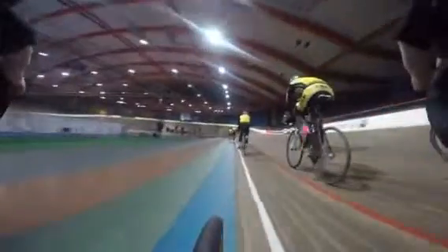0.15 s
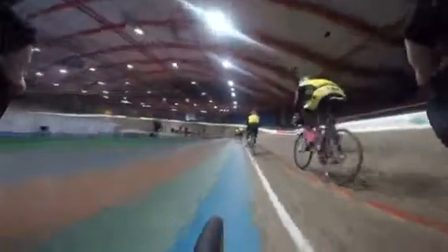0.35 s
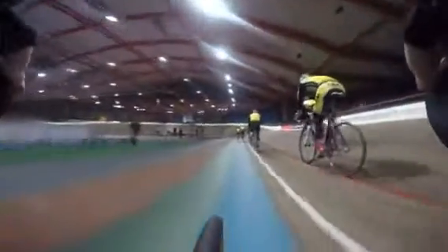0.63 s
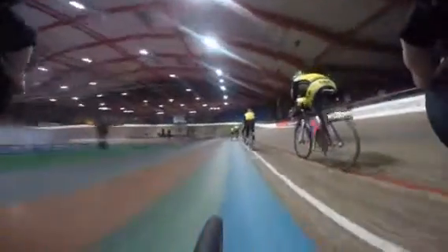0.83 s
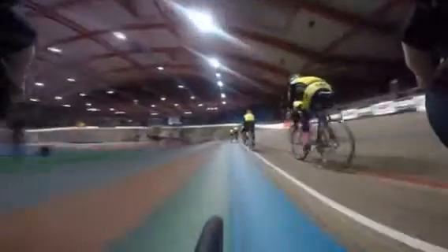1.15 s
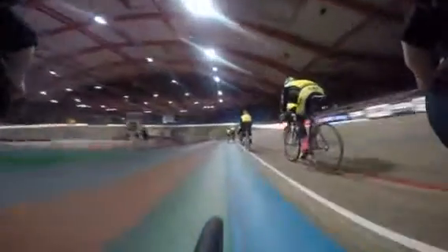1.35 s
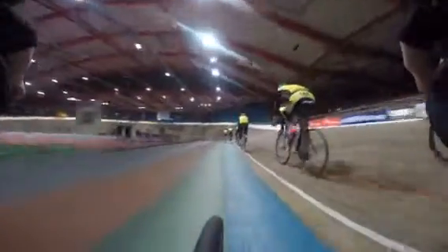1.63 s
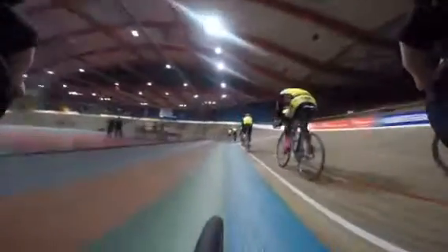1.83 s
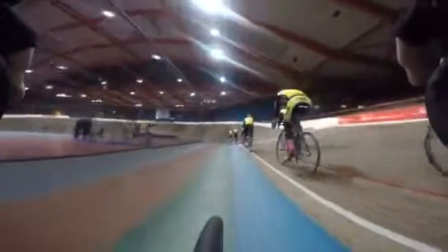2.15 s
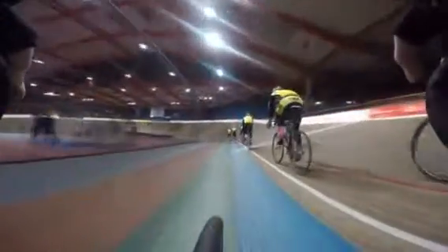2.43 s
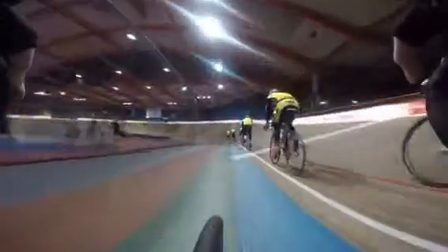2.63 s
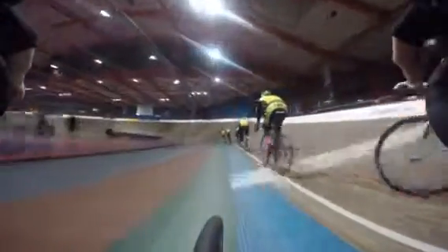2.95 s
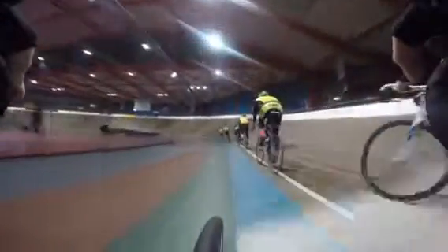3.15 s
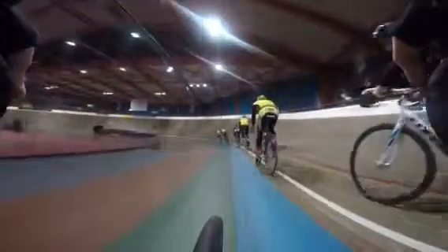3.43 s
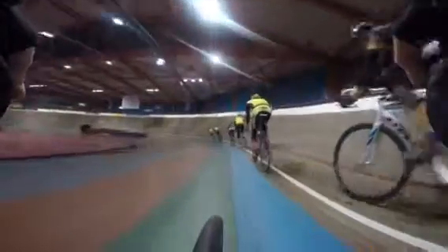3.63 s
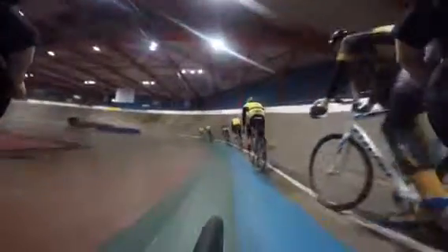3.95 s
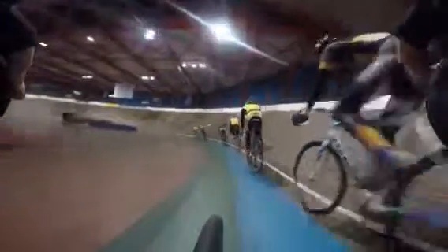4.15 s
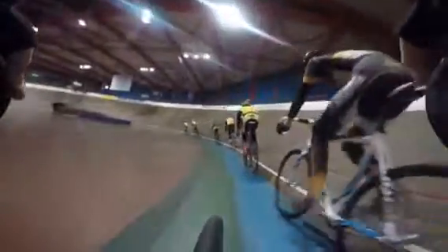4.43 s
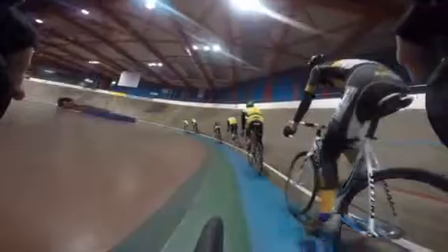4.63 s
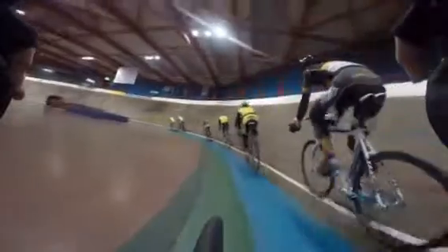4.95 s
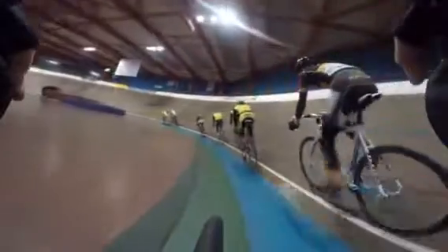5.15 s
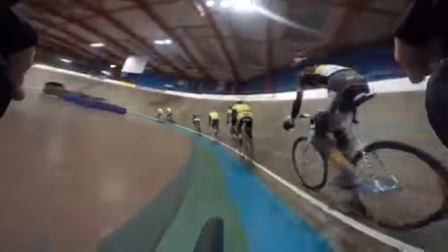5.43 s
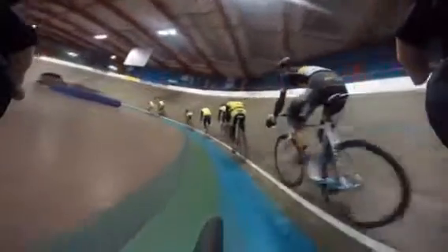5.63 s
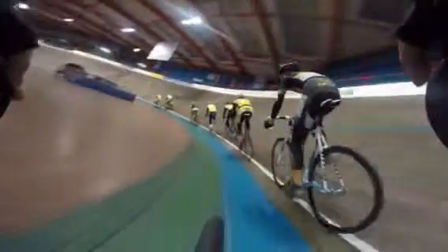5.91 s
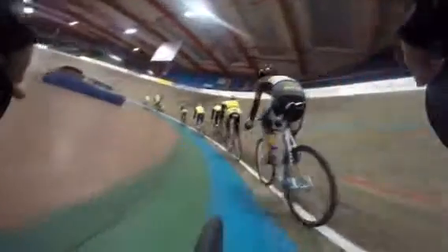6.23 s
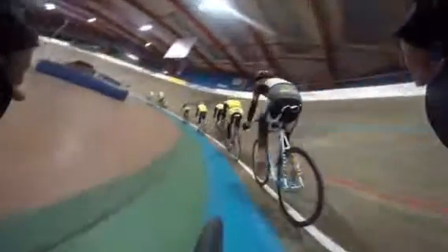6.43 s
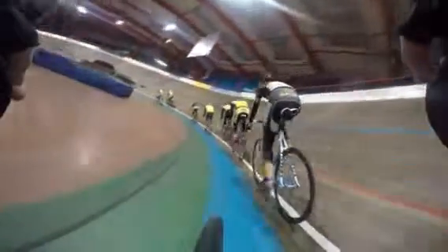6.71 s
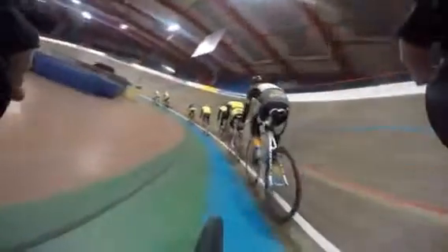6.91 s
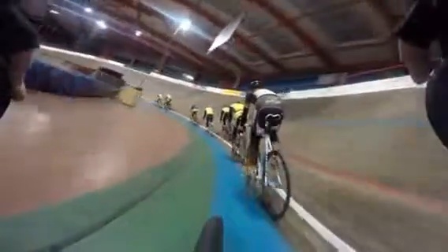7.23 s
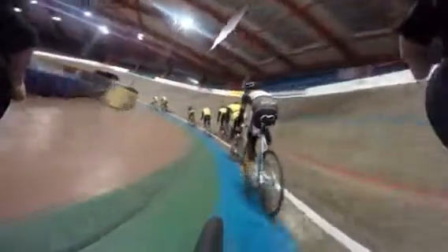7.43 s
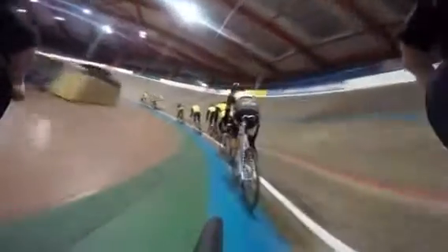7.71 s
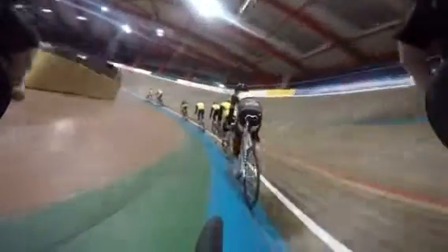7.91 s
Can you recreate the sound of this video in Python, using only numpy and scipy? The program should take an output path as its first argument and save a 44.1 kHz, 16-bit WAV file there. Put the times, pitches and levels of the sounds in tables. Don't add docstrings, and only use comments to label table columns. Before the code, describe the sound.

Close, rough on-bike sound on an indoor banked wooden track. Continuous deep wind rumble and a hollow mid-low tyre hum lie beneath a dense, bright chain rattle that surges two to three times a second. Stiff links snap metallically while board joints thump and loose boards knock. A faint airy hiss swells slightly as another rider passes, and the final strokes soften.

```python
import sys
import numpy as np
from scipy import signal
from scipy.fft import next_fast_len
from scipy.io import wavfile
from scipy.ndimage import uniform_filter1d

SR = 44100
rng = np.random.default_rng(int(sys.argv[2]) if len(sys.argv) > 2 else 0)


def bounce(signal):
    frames = np.transpose(np.atleast_2d(signal))
    limited = np.clip(frames, -1, 1)
    pcm = np.round(limited * 32767).astype(np.int16)
    wavfile.write(sys.argv[1], SR, pcm)


def how_loud(loudness_db):
    steps = np.asarray(loudness_db, float) / 20
    return 10 ** steps


N = 355887
T = np.arange(N) / SR

# (time [s], wind level [dB], tyre roar level [dB])
RIDE_LEVELS = [(0, -14.5, -17), (.42, -17.5, -18.5), (.75, -20, -18), (1.2, -16, -19.5), (1.9, -18, -21),
               (2.3, -17, -23.5), (2.75, -16, -20), (3.3, -15, -19.5), (3.6, -19.5, -23), (4.2, -16.5, -19),
               (4.7, -17.5, -22), (5.12, -14, -20.5), (5.9, -19, -19), (6.35, -18.5, -18.5),
               (6.75, -17, -20.5), (7.3, -17.5, -20), (7.7, -18, -19.5), (8.07, -14.5, -18.5)]


def chain():
    # (time [s], links passed [count])
    link_passes = [(0.0, 0.31), (0.67, 48.37), (1.34, 96.18), (2.02, 143.74), (2.69, 189.82),
                   (3.36, 235.13), (4.04, 280.36), (4.71, 324.1), (5.38, 367.2), (6.05, 410.13),
                   (6.72, 452.98), (7.4, 496.08), (8.07, 538.14)]
    # (time [s], peak [dB], brightness [dB])
    clank_events = [(0.5775, -16, -5), (0.608, -4.5, -0.5), (1.2214, -9.5, -7), (1.3356, -8.5, 0.5),
                    (1.635, -8, -6), (1.8468, -8, -3), (1.965, -3, -5), (2.6312, -10, -2),
                    (2.6907, -6.5, -5), (2.8948, -14, 2), (3.251, -15, 6), (3.3406, -8.5, -2),
                    (3.3727, -6.5, -1), (3.727, -11, -4), (3.791, -8, 1.5), (4.0014, -3, -6),
                    (4.0626, -12.5, -10), (4.1242, -14.5, 9), (4.188, -11, -6), (4.4106, -12.5, 2),
                    (4.4258, -8, 2), (4.5394, -9, -6), (4.8024, -11, 2), (4.8318, -6, -21),
                    (5.0648, -10, -4.5), (5.2016, -12, 0), (5.579, -10, -6), (5.6123, -5.5, -3),
                    (5.671, -11, -11.5), (5.9348, -9.5, -2)]
    # (frequency [Hz], width [Hz], level [dB])
    metal_modes = [(1207, 17, -4), (1295, 64.6, 3), (1390.6, 16.6, 1.5), (1705, 38, -5), (1953, 81, -12),
                   (2127, 240, -13), (2408, 73, -1), (2766, 26, -4), (3115, 110, -3), (3202, 16.6, 2.5),
                   (3256, 113, -1), (3270, 86, 0), (3670, 9.5, -6.5), (4027, 183, -9), (4406, 38, -7),
                   (4570, 196, -9), (5070, 86, -10), (6064, 170, -21), (7040, 74, -27), (7670, 130, -22.5),
                   (8100, 150, -22.5), (8170, 91, -57), (8570, 200, -30), (9370, 84, -31.5),
                   (10060, 330, -39), (10040, 52, -37), (12100, 5000, -50)]
    stiff_links = [12, 14, 18, 22, 37, 42, 44, 68, 71, 88, 90, 94]
    chain_links, modes = 96, len(metal_modes)
    slap_db, slap_s = .8, .06
    snap_db, snap_bright_db, snap_growth = 5, 2, 1.5
    snap_share = .03
    clack_hz, clack_width_hz = 3270, 140

    load_db, bright_db = pedalling()
    flap = uniform_filter1d(rng.standard_normal(N), round(slap_s * SR), mode="wrap")
    load_db = load_db + slap_db * evened(flap)

    count = np.arange(1, int(link_passes[-1][1]) + 1)
    link = count % chain_links
    seat_s = np.interp(count, *np.transpose(link_passes)[::-1])
    chance = rng.standard_normal((len(count), modes + 3))
    stiff_db = 2.0 * rng.standard_normal(chain_links)[link] + 2.0 * chance[:, 0]
    stiff_db += 2.0 * (-1) ** count
    lift_s = seat_s + 0.0063 + 0.0048 * chance[:, 2]
    contact_s = np.r_[seat_s - .002 + .0009 * chance[:, 1], lift_s]

    luck = rng.random((len(count), 3))
    near = abs(seat_s[:, None] - np.transpose(clank_events)[0]).min(1) < .012
    light_db = snap_growth * (np.interp(seat_s, T, load_db) + 25) - 25.5
    light_db = light_db + snap_db + 6 * (luck[:, 1] - .5)
    light_bright_db = snap_bright_db + 10 * (luck[:, 2] - .5)
    light = np.c_[seat_s - .003, light_db, light_bright_db]
    snapping = (luck[:, 0] < snap_share) | np.isin(link, stiff_links)
    s, peak_db, clank_bright_db = np.r_[clank_events, light[snapping & ~near]].T

    colour = rng.standard_normal((len(s), modes))
    late = rng.random((len(s), modes))
    pause = hush(s - .005, peak_db, quiet_db=-10, length_s=0.002)
    shared, out = rng.standard_normal(N), np.zeros(N)
    for k, (hz, width_hz, db) in enumerate(metal_modes):
        tilt = np.log2(hz / 3200)
        size = how_loud(stiff_db + 2.7 * chance[:, k + 3])
        size = np.r_[size, .55 * size[::-1]]
        lag_s = .003 * rng.random(len(contact_s))
        rattle = (0.75 * shared + 0.82 * rng.standard_normal(N)) / np.sqrt(np.pi * 100 / SR)
        links = (0.15 + 1.605 * bursts(contact_s, size, 0.00029, 0.003)) * rattle
        links += how_loud(25.5) * blows(contact_s + lag_s, size)
        reach_db = clank_bright_db * np.clip(tilt, 0, 1.9) + 4.8 * min(tilt, 0) - 2.1 * max(tilt, 0)
        reach_db -= 9 * np.exp(-(tilt / .12) ** 2)
        snaps = blows(s + .002 * late[:, k], how_loud(peak_db + 31 + reach_db + 4 * colour[:, k]))
        force = how_loud(load_db - 8.5 + bright_db * min(tilt, 1.4)) * links * pause + snaps
        out += how_loud(db) * ring(ring(force, hz, 4 * width_hz), hz, width_hz)
    clacks = blows(s - .0004, how_loud(peak_db + 37 + 1.5 * colour[:, 0]))
    return out + ring(ring(clacks, clack_hz, 2 * clack_width_hz), clack_hz, clack_width_hz)


def pedalling():
    # (dead centre before [s], slack level [dB], full load [s], chain load [dB],
    # brightness [dB])
    strokes = [(.08, -30, 0.16, -25, -0.5), (.44, -29.5, 0.59, -23, -0.5), (.68, -31, .99, -25.5, 0),
               (1.1, -29, 1.31, -20, -1.5), (1.46, -26.5, 1.62, -21, 1), (1.73, -33, 1.89, -23.5, 1),
               (2.09, -33, 2.37, -24.5, 0.5), (2.45, -31, 2.68, -21, 0), (2.8, -33, 2.95, -21.5, -0.5),
               (3.12, -28, 3.36, -22, 1), (3.56, -34, 3.7, -21, 1), (3.94, -28, 4.14, -19.5, -0.5),
               (4.29, -26, 4.43, -20.5, 0.5), (4.64, -28, 4.9, -22, 2.5), (5.03, -27.5, 5.18, -20.5, 1.5),
               (5.29, -28, 5.61, -21, 0.5), (5.75, -31.5, 5.92, -19.5, 0.5), (6.05, -29.5, 6.22, -26, 1.5),
               (6.45, -32.5, 8.7, -25, 1), (6.8, -28, 6.92, -26, 1), (7.12, -31, 7.4, -27, 1.5),
               (7.6, -26.5, 8, -27.5, -1)]
    slack_bright_db, push_shape = 1.5, 0.49
    dead_s, slack_db, top_s, top_db, bright_db = np.transpose(strokes)
    marks_s = np.r_[np.c_[dead_s, top_s].ravel(), top_s[-1] + .25]
    phase = np.pi / 2 * np.interp(T, marks_s, np.arange(len(marks_s)))
    push = abs(np.sin(phase)) ** (2 * push_shape)
    slack_db = np.interp(T, dead_s, slack_db)
    top_db = np.interp(T, top_s, top_db)
    bright_db = np.interp(T, top_s, bright_db)
    load_db = slack_db + push * (top_db - slack_db)
    return load_db, slack_bright_db + push * (bright_db - slack_bright_db)


def tyres():
    # (time [s], peak [dB], brightness [dB])
    joint_hits = [(0.166, -4, 0.5), (0.634, -7, -7), (0.846, -6, -2), (1.432, -4.5, -3), (1.701, -4, -11),
                  (1.852, -4.5, -3), (1.971, -2, 0.5), (2.051, -2, 0.5), (2.122, -3, -30),
                  (2.48, -2.5, -22), (2.736, -4, -6), (3.073, -11, 2), (3.288, -4, -11), (3.346, -13, 8),
                  (3.493, -4, 0.5), (3.835, -1.5, -6), (4.066, -3.5, -2), (4.191, -5, -2), (4.222, -5, -13),
                  (4.597, -1.5, -2.5), (5.285, -14, -9), (5.584, -3, -9), (5.616, -9, -4),
                  (5.849, -10.5, 7.5), (5.889, -1.5, -28), (6.121, -3, -20), (6.359, -4, -36),
                  (6.698, -3, -8), (7.365, -11.5, 4), (7.662, -21, -3)]
    # (frequency [Hz], width [Hz], level [dB])
    frame_modes = [(421, 44.3, 1), (468, 75.4, -2.5), (570, 26, -7), (637, 38.5, -11.5), (752, 51, -21),
                   (904.5, 45, -19.5), (1073, 116, -20)]
    s, peak_db, bright_db = np.transpose(joint_hits)
    lumps = how_loud(2.9 * evened(uniform_filter1d(rng.standard_normal(N), size=900)))
    pause = hush(s - .012, peak_db, quiet_db=-8.0, length_s=0.0082)
    roar = how_loud(curves(RIDE_LEVELS)[1] - 1.0) * lumps * pause
    out = np.zeros(N)
    for hz, width_hz, db in frame_modes:
        tilt = np.log2(hz / frame_modes[0][0])
        kicks = blows(s + .0005, how_loud(peak_db + 40.5 + (bright_db + 3) * tilt))
        grain = rng.standard_normal(N) / np.sqrt(np.pi * 70 / SR)
        out += how_loud(db) * ring(ring(roar * grain + kicks, hz, 3 * width_hz), hz, width_hz)
    return out


def knocks():
    # (time [s], peak [dB], pitch [Hz])
    board_knocks = [(0.162, -31, 563), (0.276, -12, 618), (0.607, -23, 634), (0.75, -16, 645),
                    (1.425, -5, 557), (1.554, -32, 1030), (1.698, -16, 546), (1.849, -21, 550),
                    (1.97, -19, 560), (2.05, -21, 567), (2.381, -21, 640), (2.726, -9.5, 530),
                    (2.783, -14.5, 644), (2.946, -18.5, 1040), (3.071, -17.5, 684), (3.34, -11.5, 585),
                    (3.371, -10, 570), (3.484, -10.5, 557), (3.604, -21, 1030), (3.823, -15.5, 730),
                    (4.479, -21, 657), (4.608, -2.5, 560), (4.797, -37, 561), (4.939, -12, 572.6),
                    (4.966, -12.5, 791), (5.304, -13, 662), (5.421, -18, 616), (5.61, -11.5, 540),
                    (6.359, -17, 637), (7.177, -25, 640)]
    t, out = np.arange(3000) / SR, np.zeros(N + 3000)
    swell = (1 - np.exp(-t / .0012)) * np.exp(-t / .009)
    for s, peak_db, hz in board_knocks:
        angle = 2 * np.pi * hz * t
        trio = np.sin(angle) + .45 * np.sin(1.22 * angle) + .45 * np.sin(.83 * angle)
        at = max(round((s + 0.00088) * SR), 0)
        out[at:at + 3000] += how_loud(peak_db + 1.5) * trio * swell
    return out[:N]


def wind():
    # (frequency [Hz], level [dB per Hz])
    wind_spectrum = [(8.8, -37), (15, 4.5), (32, -0.5), (72, 2.5), (87, -7.5), (113, -9.5), (292, -21),
                     (335, -23.5), (400, -13.5), (520, -25), (880, -120)]
    # (time of the top [s], level [dB], length [s])
    sway_events = [(.18, -18, 0.045), (.56, -10, 0.049), (.78, -6, 0.1), (1.27, -15, 0.041),
                   (1.583, -13, 0.071), (1.88, -5.5, 0.072), (2.8, -14, 0.046), (4.35, -18, 0.068),
                   (4.66, -19, 0.072), (5.91, -6.5, .08), (6.095, -9.5, 0.054), (6.386, -5, 0.12),
                   (7.108, -22, 0.21), (7.37, -9, 0.056), (7.63, -12.5, 0.039)]
    sway_hz, sway_width_hz, rest_db = 77, 5, -18.5
    evenness = .8
    wander = ring(rng.standard_normal(N), sway_hz, sway_width_hz)
    wander = ring(wander, sway_hz, sway_width_hz)
    wander = signal.hilbert(wander, next_fast_len(N))[:N]
    sway = evened((wander / abs(wander) ** evenness).real)
    swing = how_loud(rest_db) + sum(how_loud(db) * bump(s, length_s) for s, db, length_s in sway_events)
    buffeting = how_loud(curves(RIDE_LEVELS)[0] + 2.5) * noise(wind_spectrum, 0.75, wide=3, long=4)
    return buffeting + how_loud(-8.5) * swing * sway


def hall():
    # (frequency [Hz], level [dB per Hz])
    hiss_spectrum = [(900, -29), (1500, -12), (2400, -8.5), (3260, -7), (3700, -35), (4620, -14.5),
                     (5500, -18.5), (7140, -27), (9200, -35.5), (10700, -36), (12000, -34), (13500, -38.5),
                     (15200, -38)]
    rush_db, rush_follows = -62, 0.1
    pass_s, pass_db, pass_length_s = 5.6, 1.5, 2.3
    level_db = rush_db + rush_follows * (pedalling()[0] + 25) + pass_db * bump(pass_s, pass_length_s)
    return how_loud(23.5 + level_db) * noise(hiss_spectrum, 1.6, wide=60, long=2)


def evened(x):
    return x / np.sqrt(np.mean(x ** 2) + 1e-20)


def curves(rows):
    s, *columns = np.transpose(rows)
    return [np.interp(T, s, c) for c in columns]


def ring(x, hz, width_hz):
    r = np.exp(-np.pi * width_hz / SR)
    return 2 * signal.lfilter([1 - r], [1, -r * np.exp(2j * np.pi * hz / SR)], x).real


def blows(s, gain):
    return np.bincount(np.clip(np.round(s * SR).astype(int), 0, N - 1), gain, N)


def bursts(s, gain, rise_s, fall_s):
    slow = np.exp(-1 / (fall_s * SR))
    quick = np.exp(-1 / (fall_s * SR) - 1 / (rise_s * SR))
    return signal.lfilter([0, slow - quick], np.convolve([1, -slow], [1, -quick]), blows(s, gain))


def hush(s, peak_db, quiet_db, length_s):
    depth = np.clip((peak_db - quiet_db) / 12, 0, 1)
    return 1 - np.clip(1.5 * bursts(s, depth, .0005, length_s), 0, .85)


def bump(s, length_s):
    return np.exp(-((T - s) / length_s) ** 2)


def noise(points, patchy_db, wide, long):
    hz = np.fft.rfftfreq(2048, 1 / SR)
    a, b, patches = rng.standard_normal((N // 512 + 5, 1025, 3)).T
    patches = evened(uniform_filter1d(uniform_filter1d(patches, wide, 0), long, 1))
    point_hz, level_db = np.transpose(points)
    colour_db = np.interp(np.log(hz + 1), np.log(point_hz + 1), level_db, right=-120)
    z = (a + 1j * b) * how_loud(colour_db[:, None] + patchy_db * patches)
    return evened(signal.istft(z, nperseg=2048, noverlap=1536)[1][:N])


def scene():
    return (chain() + tyres() + knocks() + wind() + hall())[None]


def roll_off(x):
    return signal.sosfilt(signal.butter(12, 15770, fs=SR, output="sos"), x)


def record(dry):
    ceiling, edge_hz = .98, 15340
    limited = dry / (1 + (abs(dry) / ceiling) ** 4) ** .25
    edge = signal.firwin(601, edge_hz, window=("kaiser", 2), fs=SR)
    return roll_off(signal.oaconvolve(limited, edge[None], "same"))


dry = scene()
out = record(dry)
bounce(out)
```